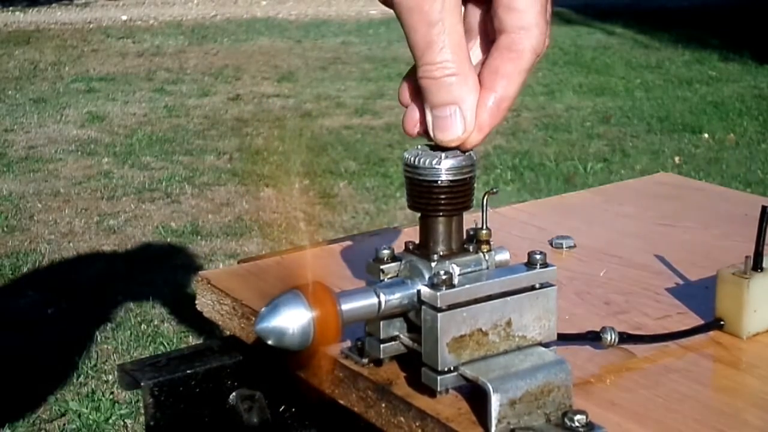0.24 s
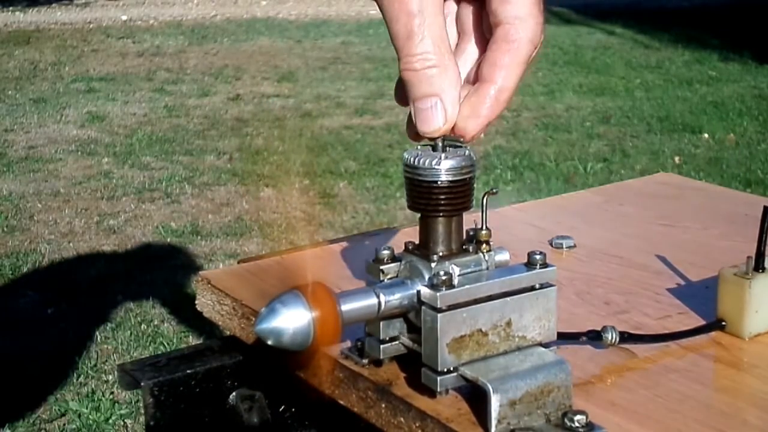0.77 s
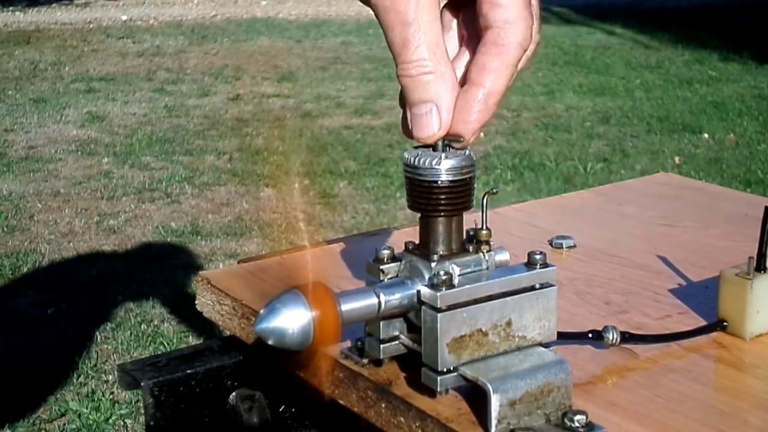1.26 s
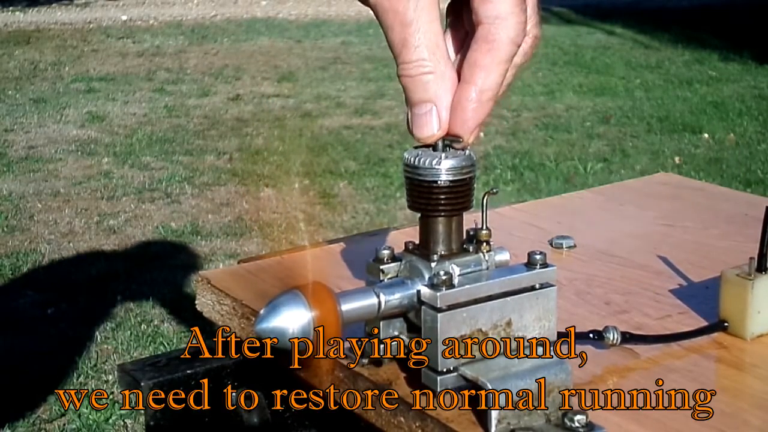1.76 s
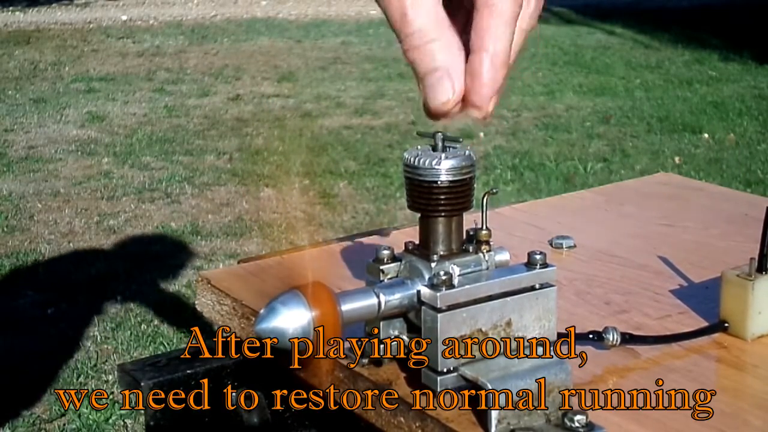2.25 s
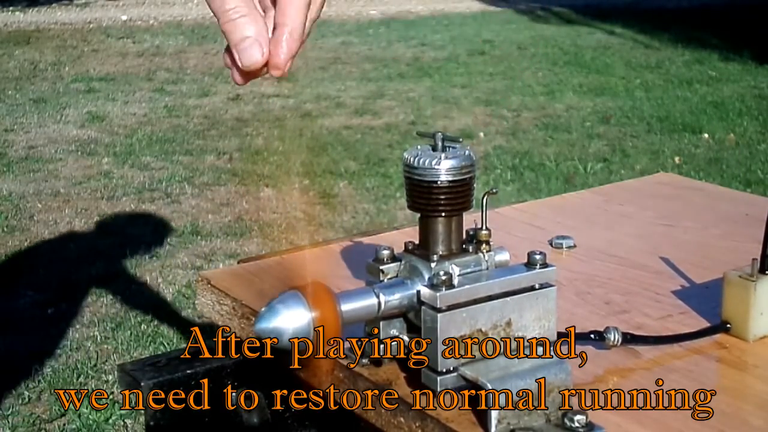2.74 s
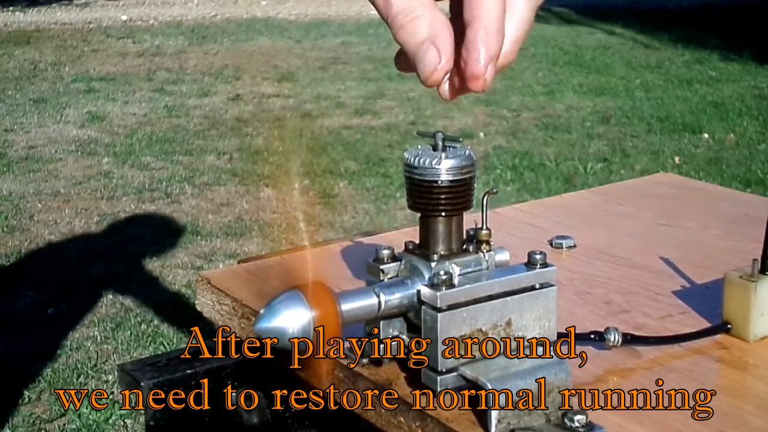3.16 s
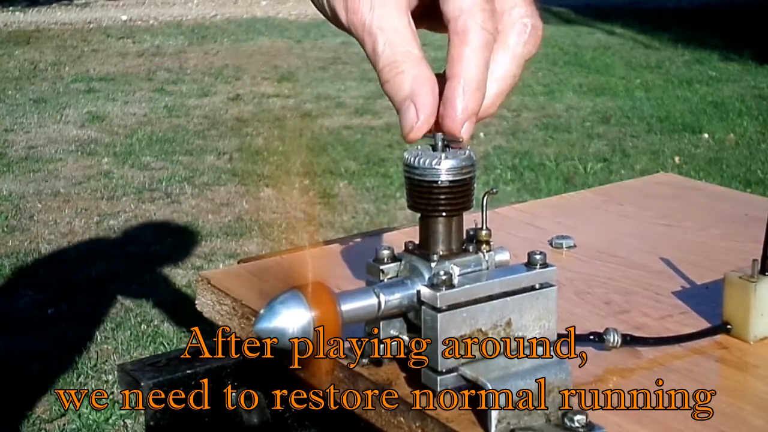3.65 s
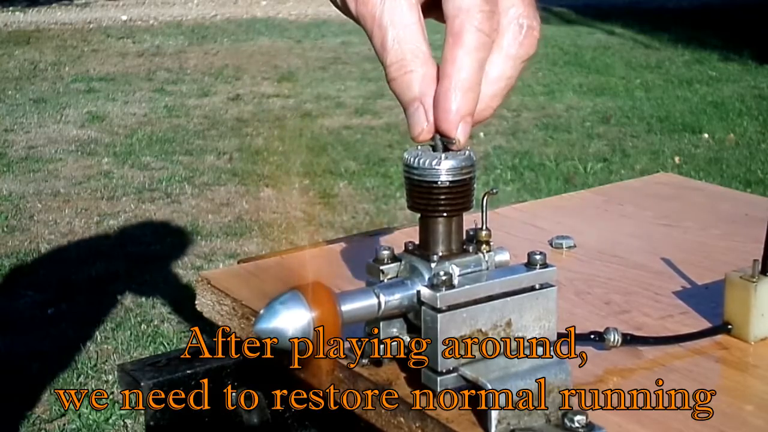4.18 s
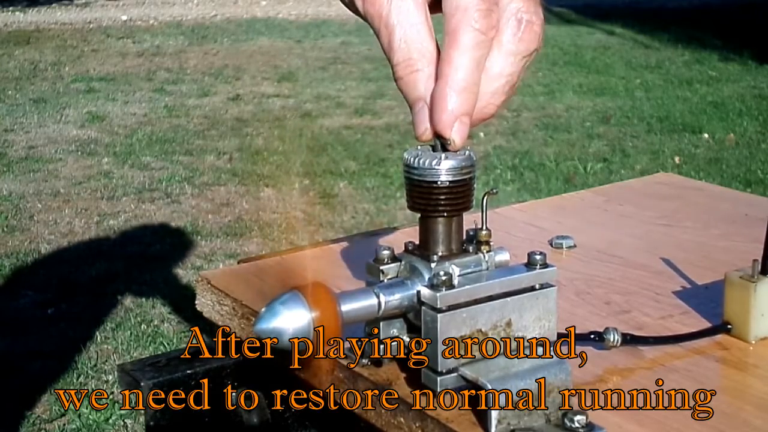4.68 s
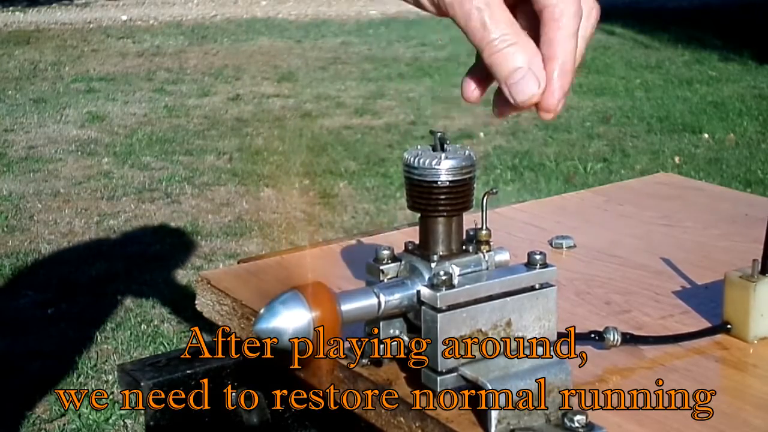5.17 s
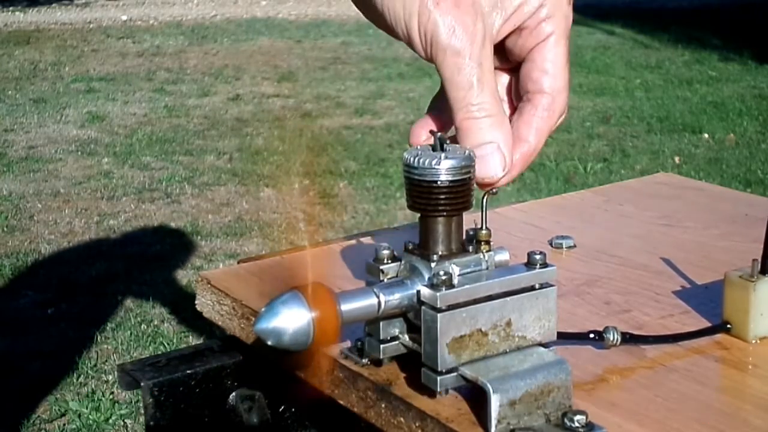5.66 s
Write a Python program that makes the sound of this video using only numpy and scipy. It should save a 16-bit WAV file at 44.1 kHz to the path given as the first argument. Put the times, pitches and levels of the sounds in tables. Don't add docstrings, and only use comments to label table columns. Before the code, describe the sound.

Close, dry, loud outdoor pickup of a tiny engine spinning a two-blade propeller. A continuous hard buzz, nasal and bright, with low hum beneath and a dense rush of air above. It hiccups irregularly, sagging slightly in pitch and catching again with small bangs; the level dips after the hardest cracks. The hiss colour shifts subtly as a hand moves nearby. Towards the end it runs faster and more evenly, without stopping.

```python
import sys
import numpy as np
from scipy import signal
from scipy.fft import rfft, irfft
from scipy.io import wavfile
from scipy.ndimage import uniform_filter1d

SR = 44100
rng = np.random.default_rng(int(sys.argv[2]) if len(sys.argv) > 2 else 0)


def voltage_ratio(level):
    return 10 ** (np.asarray(level, float) / 20)


def materialize(psi):
    bounded = np.clip(np.atleast_2d(psi).T, -1, 1)
    quanta = np.round(bounded * 32767).astype(np.int16)
    wavfile.write(sys.argv[1], SR, quanta)


N = 261513
AIR_DB = -19

# first t/s, last t/s, deepest loss/dB, extra bang on relighting/dB
STUMBLES = [(.165, .192, 12, 1), (.734, .772, 16, 0), (.833, .853, 17, 1), (.874, .874, 3, 4),
            (1.052, 1.072, 9, 3), (1.092, 1.102, 3, 4), (1.322, 1.331, 3, 1), (1.444, 1.464, 15, 2),
            (1.69, 1.69, 3, 0), (1.736, 1.736, 8, 1), (1.859, 1.859, 3, 0), (1.906, 1.925, 9, 3),
            (1.974, 1.974, 3, 0), (2.153, 2.172, 6, 1), (2.286, 2.286, 3, 0), (2.305, 2.325, 5, 4),
            (2.364, 2.375, 11, 2), (2.7, 2.7, 3, 0), (2.784, 2.784, 3, 0), (2.812, 2.831, 10, 1),
            (2.945, 2.945, 5, 5), (3.16, 3.179, 9, 2), (3.295, 3.295, 6, 0), (3.333, 3.353, 12, 2),
            (3.479, 3.499, 11, 2), (3.549, 3.559, 7, 2), (3.749, 3.749, 3, 0), (3.915, 3.924, 8, 3),
            (4.206, 4.206, 3, 0), (4.638, 4.638, 3, 0)]
# t/s, crack level/dB, gain duck/dB
CRACKS = [
    (0.201, -17, 2),
    (1.082, -21, 2.5),
    (1.9336, -18, 4),
]
# t/s, delay/ms, signed gain/1, signed gain of a return just behind/1
PALM = [(0, 1.25, 0, -.27), (.3, 1.29, .22, -.27), (1.7, 1.3, .24, -.3), (2.15, 1.4, .12, -.3),
        (2.36, 1.54, .2, -.18), (2.46, 1.66, .25, -.2), (2.54, 1.76, .44, 0), (2.66, 1.92, .56, 0),
        (3.05, 1.94, .58, 0), (3.3, 1.76, .44, 0), (3.42, 1.68, .45, 0), (3.6, 1.62, .24, 0),
        (4.2, 1.72, .41, 0), (4.75, 1.7, .3, -.05), (5.1, 1.66, .15, -.1), (5.24, 1.58, .36, -.1),
        (5.36, 1.55, .1, -.25), (5.5, 1.34, .2, 0)]
SLEEVE = [(0, 1.96, .17, -.24), (.25, 1.97, .45, -.25), (1.2, 1.94, .55, -.27), (1.95, 1.98, .62, -.22),
          (2.28, 2.02, .42, -.15), (2.4, 2.1, .2, -.15), (2.54, 2.26, .26, -.1), (2.75, 2.52, .28, 0),
          (3.1, 2.52, .12, -.15), (3.3, 2.26, .28, -.1), (3.42, 2.24, .38, -.21), (3.8, 2.22, .3, -.24),
          (4.3, 2.22, .36, -.12), (4.8, 2.21, .18, -.23), (5.15, 2.22, 0, -.28), (5.93, 2.22, 0, -.2)]
RETURN_MS = .27, .17, .52


def evened(x):
    return x / np.sqrt(np.mean(x ** 2) + 1e-20)


def curve(rows, t):
    s, *columns = np.transpose(rows)
    return [np.interp(t, s, c) for c in columns]


def on_turns(s, rows):
    at, value = np.transpose(rows)
    nearest = np.abs(s[:, None] - at).argmin(0)
    return np.bincount(nearest, value, len(s))


def clicks(s, size):
    reach = np.arange(-8, 9)
    at = np.floor(s * SR).astype(int)[:, None] + reach
    off = at - s[:, None] * SR
    shape = np.sinc(off) * np.cos(np.pi * off / 18) ** 2 * size[:, None]
    ok = (at >= 0) & (at < N)
    return np.bincount(at[ok], shape[ok], N)


def ring(x, hz, width):
    r = np.exp(-np.pi * width / SR)
    return signal.lfilter([1], [1, -2 * r * np.cos(2 * np.pi * hz / SR), r * r], x)


def crank():
    # t/s, speed/(turns per s)
    setting = [(0.0, 118.36), (0.24, 108.69), (0.49, 108.38), (0.69, 114.14), (0.77, 103.72), (1.45, 108.6),
               (2.2, 107.75), (2.37, 102.45), (2.55, 109.28), (3.05, 107.9), (3.58, 106.23), (3.64, 107.37),
               (3.69, 109.91), (4.5, 112.39), (4.53, 109.09), (4.99, 117.45), (5.22, 113.26),
               (5.58, 116.75), (5.93, 115.07)]
    inertia_s, brake_turns_per_s, stroke_s = .0628, 20.843, .009
    first_turn, cruise_turns_per_s = .762, 110
    t = np.arange(N) / SR
    pull = curve(setting, t)[0]
    for first, last, loss_db, _ in STUMBLES:
        dead = (t > first - stroke_s) * (t < last + stroke_s)
        pull = pull - brake_turns_per_s * (1 - voltage_ratio(-loss_db)) * dead
    r = np.exp(-1 / SR / inertia_s)
    speed = signal.lfilter([1 - r], [1, -r], pull, zi=[r * pull[0]])[0]
    turns = first_turn + np.cumsum(speed) / SR
    port_opens = np.interp(np.arange(1, turns[-1]), turns, t)
    return speed - cruise_turns_per_s, turns, port_opens


def combustion(s):
    # t/s, level/dB
    uneven = [(.24, -2.5), (.471, -6), (.965, 1), (.984, 1.5), (1.013, -2.5), (1.764, -3.5), (1.896, -3),
              (2.079, 2), (2.451, 1.5), (2.737, -1.5), (3.451, -2), (3.796, 0), (3.841, -2), (4.133, -4)]
    deepest_db, first_share, bang_share = 12.5, .75, .4
    db = .35 * rng.standard_normal(len(s)) + on_turns(s, uneven)
    for first, last, loss_db, bang_db in STUMBLES:
        a, b = np.abs(s - first).argmin(), np.abs(s - last).argmin()
        depth = np.minimum(1, first_share + np.arange(b + 1 - a) + (a == b))
        db[a:b + 1] -= min(loss_db, deepest_db) * depth
        db[b + 1] += bang_share * bang_db
    return db


def wash(air_db):
    lumps_db = 3 * evened(uniform_filter1d(rng.standard_normal(N), 120))
    noise = ring(np.diff(rng.standard_normal(N), prepend=0), 1500, 1700)
    return voltage_ratio(-38 - AIR_DB + air_db + lumps_db) * evened(noise)


def hiss(s, db, air_db):
    # f/Hz, level/(dB per Hz)
    spectrum = [(30, -28), (90, -12), (330, -13), (700, -9), (1500, -8), (2600, -10), (3600, -9.5),
                (5000, -6.5), (6800, -11.5), (7600, -5.5), (8600, -7.5), (11500, 0), (13500, -9.5),
                (15500, -19), (20000, -30)]
    # time after the port opens/ms, length/ms, strength/1
    gusts = [
        (.36, .17, .85),
        (-.02, .1, .45),
        (1.95, .33, .5),
        (-2.1, .22, .3),
        (-.8, .75, .3),
    ]
    hz, (f, level_db) = np.fft.rfftfreq(N, 1 / SR), np.transpose(spectrum)
    colour = voltage_ratio(np.interp(np.log(hz + 1), np.log(f), level_db))
    air = irfft(rfft(rng.standard_normal(N)) * colour, N)
    t, gate = np.arange(N) / SR, np.ones(N)
    for ms, length_ms, strength in gusts:
        chance_db = 1.2 * np.clip(rng.standard_normal(len(s)), -2, 2)
        size = strength * voltage_ratio(.45 * db + chance_db)
        bell = np.exp(-.5 * (np.arange(-150, 151) / SR * 1000 / length_ms) ** 2)
        gate += signal.oaconvolve(clicks(s + ms / 1000, size), bell, "same")
    sag_db = 0.081 * np.interp(t, s, np.minimum(db, 0))
    return voltage_ratio(air_db - 5.0 + sag_db) * evened(air * gate)


def reflected(air):
    air_echo = .4
    at, out = np.arange(N), air
    for rows, trail_ms in zip((PALM, SLEEVE), RETURN_MS):
        ms, gain, back = curve(rows, at / SR)
        for lag_ms, g in ((ms, gain), (ms + trail_ms, back)):
            lag = np.round(lag_ms * SR / 1000).astype(int)
            out = out + air_echo * g * air[np.maximum(at - lag, 0)]
    return out * np.std(air) / np.std(out)


def propeller(turns, hum_db):
    # order/1, level/dB, phase/rad
    blades = [
        (1, -6, -2.3),
        (2, 0, -.1),
        (3, -17, -2.5),
        (4, -9.5, 1.95),
    ]
    flutter_db = [1.0, 1.0, 3.0, 1.6]
    slow = uniform_filter1d(uniform_filter1d(rng.standard_normal((len(blades), N)), 900), 900)
    hum = np.zeros(N)
    for (order, db, phase), waver_db, w in zip(blades, flutter_db, slow):
        hum += voltage_ratio(db + waver_db * evened(w)) * np.cos(2 * np.pi * order * turns + phase)
    return voltage_ratio(hum_db) * evened(hum)


def rattle(s, db, air_db, hard, ms, hz, width, level_db, spread_db):
    hard_share = 1.1
    chance = rng.random((len(s), 2))
    size = voltage_ratio(.5 * db + hard_share * on_turns(s, hard) - spread_db * np.log(chance[:, 0] + .04))
    knocks = clicks(s + (ms + .3 * chance[:, 1]) / 1000, size)
    decay = np.exp(-np.arange(200) / SR / .0007)
    burst = signal.oaconvolve(knocks, decay)[:N] * np.sign(rng.standard_normal(N))
    drift_db = air_db + 26
    return voltage_ratio(level_db + drift_db) * evened(ring(np.diff(burst, prepend=0), hz, width))


def slaps_and_snaps(s, db, air_db):
    # time after the port opens/ms, f/Hz, width/Hz, level/dB, spread/dB
    knocks = [
        (-2.5, 4800, 2200, -41, .4),
        (.1, 11500, 3000, -37, 1.2),
    ]
    # t/s, extra level/dB
    slaps = [(.211, 5), (.296, 7), (.452, 5), (.545, 8), (.6, 6), (.609, 6), (.783, 11), (.864, 9),
             (.895, 6), (1.042, 6), (1.19, 8), (1.341, 5), (1.397, 7), (1.435, 8), (1.512, 5), (1.598, 5),
             (1.626, 5), (1.755, 6), (1.935, 5), (1.993, 6), (2.041, 6), (2.191, 7), (2.335, 8),
             (2.396, 11), (2.485, 7), (2.504, 5), (2.533, 9), (2.57, 5), (2.58, 6), (2.765, 6), (2.802, 7),
             (2.841, 6), (2.964, 6), (3.049, 5), (3.104, 7), (3.113, 6), (3.314, 9), (3.363, 6), (3.412, 5),
             (3.47, 7), (3.509, 5), (3.656, 7), (3.731, 5), (3.814, 5), (3.878, 6), (3.906, 6), (4.017, 7),
             (4.044, 6), (4.197, 5), (4.306, 5), (4.387, 5), (4.529, 5), (4.683, 5), (4.756, 5), (5.0, 5),
             (5.069, 5), (5.505, 5), (5.72, 5)]
    # t/s, extra level/dB
    snaps = [(.139, 4), (.147, 5), (.783, 5), (1.284, 5), (1.474, 4), (1.868, 5), (2.144, 8), (2.182, 6),
             (2.345, 5), (2.58, 5), (3.077, 5), (3.247, 5), (3.363, 5), (3.509, 6), (3.759, 5), (3.878, 5),
             (4.8, 4), (5.625, 5), (5.754, 4)]
    return sum(rattle(s, db, air_db, hard, *row) for hard, row in zip((slaps, snaps), knocks))


def cracks():
    s, level_db, _ = np.transpose(CRACKS)
    decay = np.exp(-np.arange(200) / SR / 0.0012)
    burst = signal.oaconvolve(clicks(s, voltage_ratio(level_db)), decay)[:N]
    return ring(np.diff(burst * rng.standard_normal(N), prepend=0), 11500, 1500)


def puffs(s, db):
    puff_db, thump_db = -20, -27
    weak = 1 - voltage_ratio(np.minimum(db + 2, 0))
    relight = np.maximum(np.roll(weak, 1) - weak, 0)
    puff = clicks(s, voltage_ratio(puff_db) * weak)
    thump = sum(clicks(s + ms / 1000, g * voltage_ratio(thump_db) * relight) for ms, g in ((0, 1), (1.95, .5)))
    both = ring(puff, 2660, 250) + ring(thump, 880, 700)
    return signal.sosfilt(signal.butter(2, 300, "high", fs=SR, output="sos"), both)


def bench_and_ground(s, size):
    # delay/ms, signed gain/1
    near = [(0, 1), (.2, .16), (.39, -.07), (.56, 1.06), (.71, -.45), (.85, .78), (1.13, .18), (1.22, -.08),
            (1.39, .47), (3.06, .08), (3.41, -.07)]
    # delay/ms, level/dB
    far = [
        (4.14, -16.5),
        (4.75, -30),
    ]
    train = sum(clicks(s + ms / 1000, g * size) for ms, g in near)
    return train + sum(clicks(s + ms / 1000, voltage_ratio(echo_db) * size) for ms, echo_db in far)


def hand_and_arm(s, size, chance):
    # t/s, delay/ms, signed gain/1, signed gain of the trailing return/1
    shoulder = [(0, 3.52, .2, 0), (.2, 3.3, .05, 0), (2.1, 3.14, .1, 0), (2.35, 3.22, .14, 0),
                (2.46, 3.3, .34, 0), (2.65, 3.3, .15, -.12), (3.05, 3.3, .12, -.13), (3.3, 3.26, .16, 0),
                (3.8, 3.08, .1, 0), (4.72, 3.06, .08, 0), (4.88, 3.12, -.22, .1), (5.25, 3.12, -.1, .17),
                (5.93, 3.14, -.19, .05)]
    # t/s, delay/ms, signed gain/1
    fingers = [(0, 1.5, 0), (.4, 1.48, .11), (1.1, 1.47, .12), (1.7, 1.45, .03), (2.3, 1.42, 0),
               (2.43, 1.41, -.22), (2.6, 1.47, -.18), (2.75, 1.5, -.07), (3, 1.5, 0), (5, 1.34, 0),
               (5.15, 1.34, -.32), (5.25, 1.36, -.2), (5.37, 1.29, -.29), (5.55, 1.2, -.27),
               (5.93, 1.2, -.28)]
    wrist = [(2.5, 2.15, 0), (2.6, 2.13, -.2), (2.72, 2.04, .2), (2.95, 2.09, .18), (3.15, 1.86, -.17),
             (3.25, 1.95, .22), (3.4, 1.93, .24), (3.55, 1.95, 0), (4.1, 2, 0), (4.5, 2, -.13),
             (4.8, 2.06, .12), (5, 1.95, 0), (5.15, 1.84, -.24), (5.25, 2.04, .12), (5.5, 2.1, 0),
             (5.8, 2.11, .12)]
    forearm = [(0, 2.04, -.16), (.2, 2.04, 0), (1.2, 2.04, 0), (1.7, 2.04, -.13), (2.2, 2.06, -.1),
               (2.35, 1.97, .28), (2.51, 2.24, .24), (2.6, 2.47, .2), (2.72, 2.54, .28), (2.95, 2.49, .18),
               (3.15, 2.5, .1), (3.25, 2.52, .28), (3.4, 2.36, .26), (3.55, 2.4, 0), (3.75, 2.47, .12),
               (4, 2.54, -.17), (4.5, 2.54, -.2), (4.8, 2.5, 0)]
    elbow = [(0, 2.9, .19), (.2, 2.9, 0), (4.75, 3.22, 0), (5, 3.22, .18), (5.15, 3.22, .18),
             (5.4, 3.08, .14), (5.6, 3.08, 0)]
    chest = [(0, 3.56, .19), (.4, 3.56, .08), (.9, 3.6, 0), (2.4, 3.95, 0), (2.5, 3.99, .2), (2.6, 3.95, 0),
             (3.1, 3.6, 0), (3.25, 3.56, -.19), (3.4, 3.51, -.14), (3.6, 3.6, 0), (4.1, 3.7, 0),
             (4.5, 3.7, .11), (4.8, 3.58, -.09), (5.15, 3.58, -.12), (5.25, 3.61, -.22), (5.6, 3.7, -.11),
             (5.93, 3.67, -.14)]
    knee = [(0, 5.98, -.06), (4.5, 5.98, -.06), (4.8, 5.95, -.2), (5.2, 5.95, -.17), (5.93, 5.96, -.15)]
    # t/s, signed gain at 4.43 ms/1, signed gain at 5.15 ms/1
    fence = [
        (0, -.12, 0),
        (3.6, -.16, 0),
        (4.3, -.04, -.06),
        (5.0, -.04, -.16),
    ]
    cuff_ms, cuff_share = .33, .4
    train = np.zeros(N)
    for rows, trail_ms, wobble in zip((PALM, SLEEVE, shoulder), RETURN_MS, chance.T):
        ms, gain, back = curve(rows, s)
        wavering = size * voltage_ratio(.6 * wobble)
        train += clicks(s + ms / 1000, gain * wavering)
        train += clicks(s + (ms + trail_ms) / 1000, back * wavering)
    for rows in (fingers, wrist, forearm, elbow, chest, knee):
        ms, gain = curve(rows, s)
        train += clicks(s + ms / 1000, gain * size)
    ms, gain, _ = curve(SLEEVE, s)
    train += clicks(s + (ms + cuff_ms) / 1000, cuff_share * gain * size)
    return train + sum(clicks(s + ms / 1000, g * size) for ms, g in zip((4.43, 5.15), curve(fence, s)))


def bench_clutter(s, size):
    scatter_db, scatter_t60_s = -11, .05
    late = .0024 + .012 * rng.random(40)
    gains = rng.standard_normal(40) * voltage_ratio(scatter_db - 60 * late / scatter_t60_s)
    clutter = clicks(late, gains)[:800]
    return signal.oaconvolve(clicks(s, size), np.diff(clutter, prepend=0))[:N]


def exhaust(s, db):
    # f/Hz, width/Hz
    pop_modes = [
        (765, 250),
        (3955, 2360),
    ]
    # f/Hz, width/Hz, level/dB
    case = [
        (526, 39, -5),
        (1062, 180, -5),
        (1610, 243, -2),
        (2407, 42, -4),
        (2973, 180, 0.5),
        (3420, 460, -9),
    ]
    chance = rng.standard_normal((len(s), 3))
    s = s + 5e-6 * chance[:, 0] + 3e-5 * np.minimum(db, 0)
    size = voltage_ratio(db - 19)
    train = bench_and_ground(s, size) + hand_and_arm(s, size, chance) + bench_clutter(s, size)
    pop = np.diff(train, prepend=0)
    for hz, width in pop_modes:
        pop = ring(pop, hz, width)
    for hz, width, ring_db in case:
        tail = ring(pop - np.roll(pop, 2), hz, width)
        pop = pop + voltage_ratio(ring_db) * np.pi * width / SR * tail
    return signal.sosfilt(signal.butter(2, 170, "high", fs=SR, output="sos"), pop)


def scene():
    hum_db, hum_db_per_turn, air_db_per_turn = -31, 0.53, 0.16
    excess, turns, s = crank()
    db = combustion(s)
    swell = uniform_filter1d(uniform_filter1d(rng.standard_normal(N), 1200), 1200)
    air_db = AIR_DB + air_db_per_turn * excess + 0.52 * evened(swell)
    air = reflected(hiss(s, db, air_db) + wash(air_db))
    hum = propeller(turns, hum_db + hum_db_per_turn * excess)
    knocks = slaps_and_snaps(s, db, air_db) + cracks()
    return (air + hum + knocks + puffs(s, db) + exhaust(s, db))[None]


def gain_control():
    # t/s, level/dB
    drift = [(0, 1.5), (.7, -2), (.8, -1.5), (1.02, 0.1), (1.5, -1.5), (2.6, -0.5), (3.6, 0), (4.5, -.5),
             (5.05, -0.3), (5.25, -1.5), (5.6, 0.3), (5.93, -0.5)]
    hold_s, recover_s = 0.11, 0.12
    t = np.arange(N) / SR
    db = curve(drift, t)[0]
    for s, _, duck_db in CRACKS:
        attack = np.clip((t - s - .002) / 0.0011, 0, 1)
        release = np.exp(-np.maximum(t - s - hold_s, 0) / recover_s)
        db = db - duck_db * attack * release
    return voltage_ratio(db)


def band_limit(x):
    return signal.sosfilt(signal.butter(12, 15500, fs=SR, output="sos"), x)


def record(dry):
    edge = signal.firwin(255, 15400, window=("kaiser", 9), fs=SR)
    overloaded = 2.5 * np.tanh(dry * gain_control() / 2.5)
    limited = signal.oaconvolve(overloaded, edge[None], "same")
    return band_limit(limited)


dry = scene()
out = record(dry)
materialize(out)
```